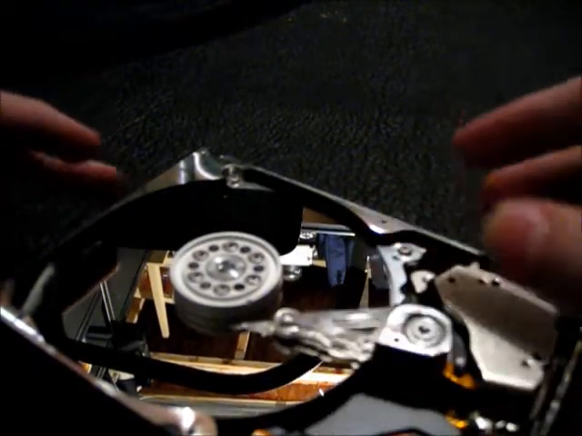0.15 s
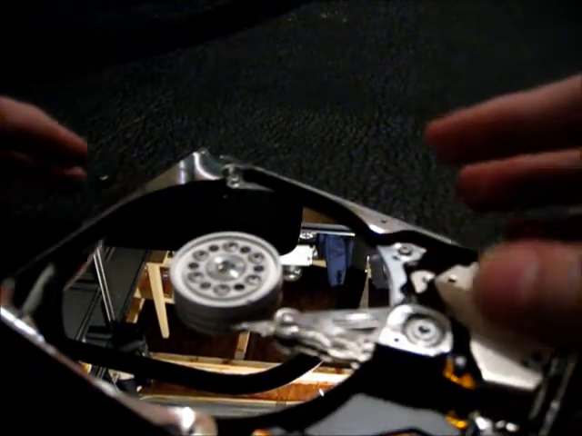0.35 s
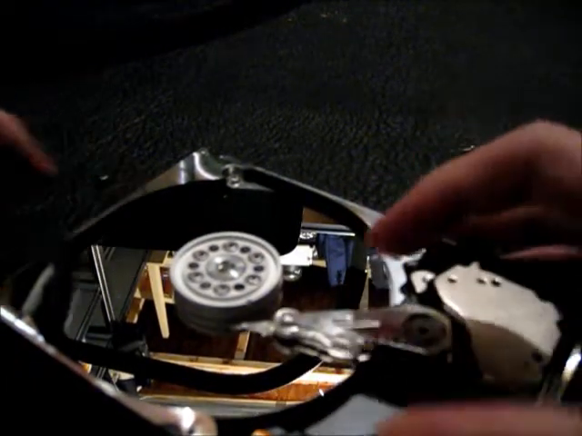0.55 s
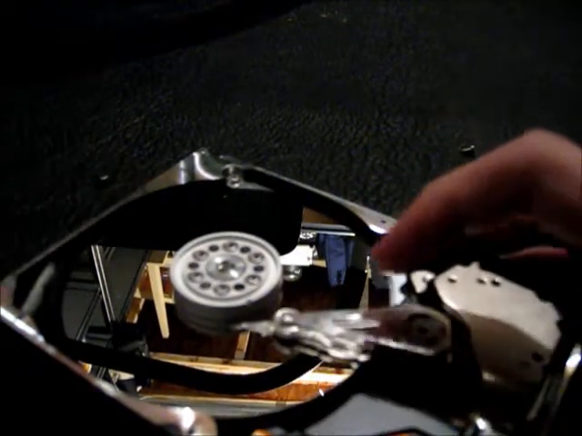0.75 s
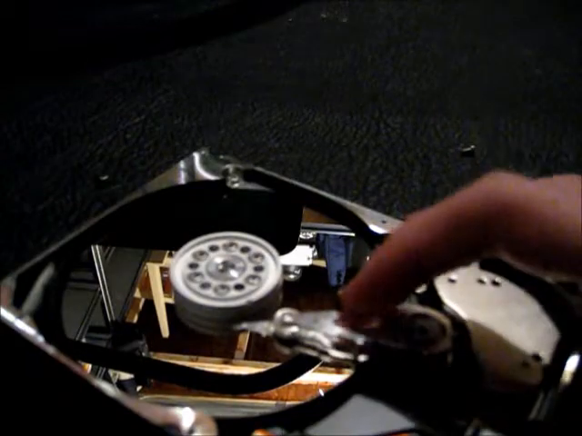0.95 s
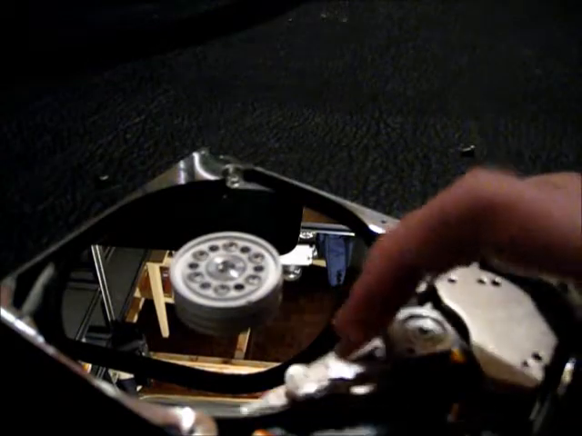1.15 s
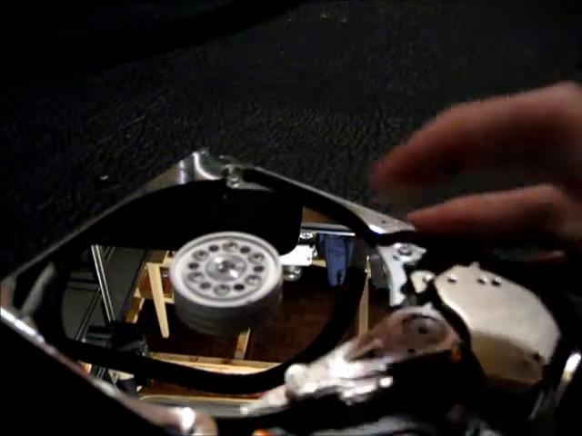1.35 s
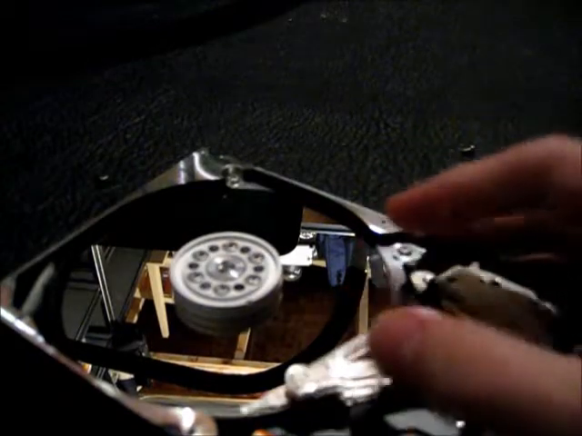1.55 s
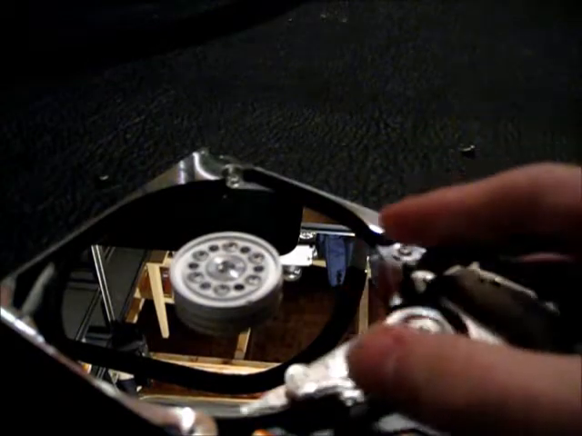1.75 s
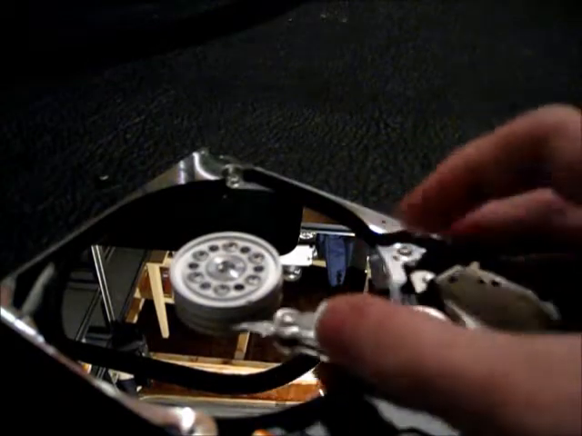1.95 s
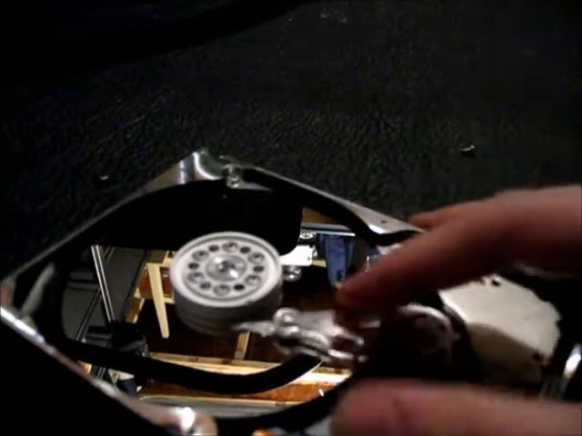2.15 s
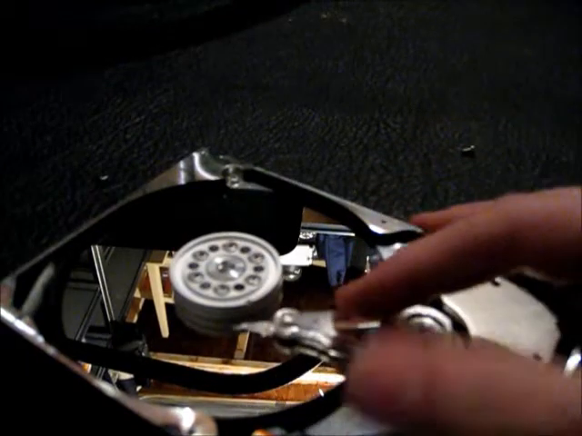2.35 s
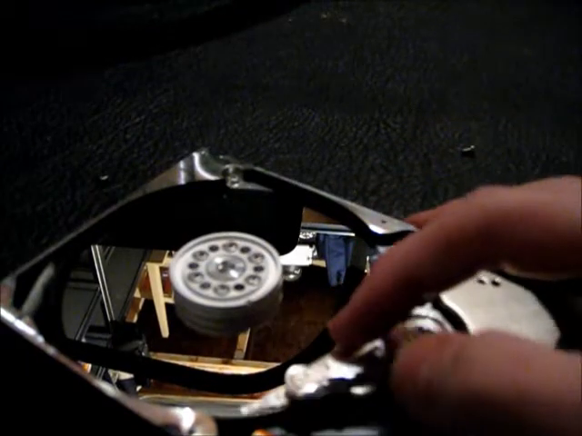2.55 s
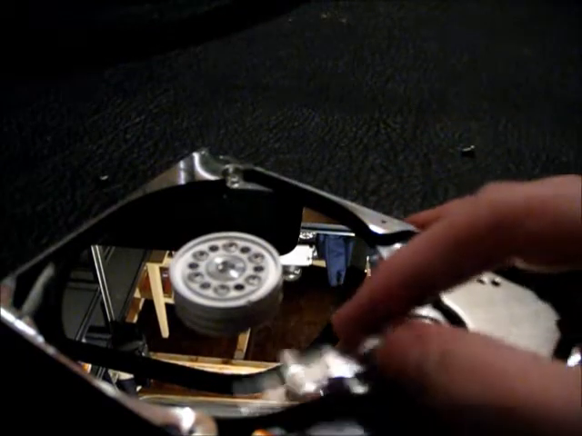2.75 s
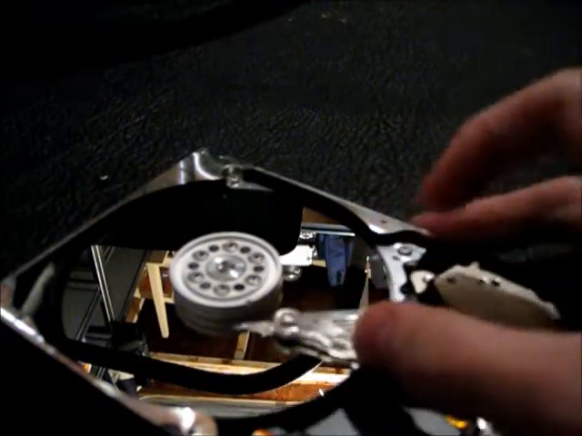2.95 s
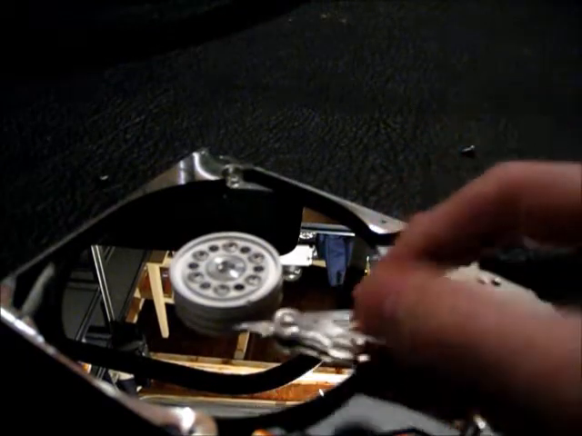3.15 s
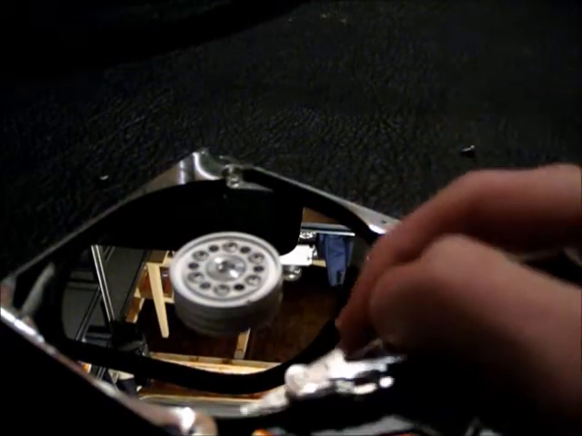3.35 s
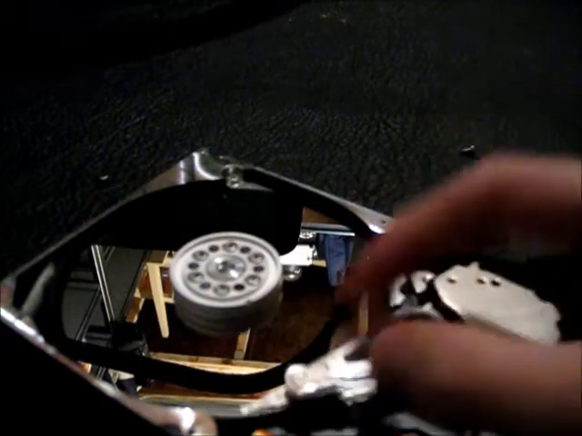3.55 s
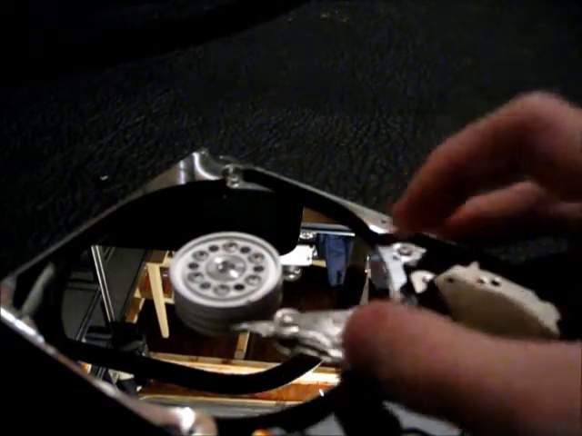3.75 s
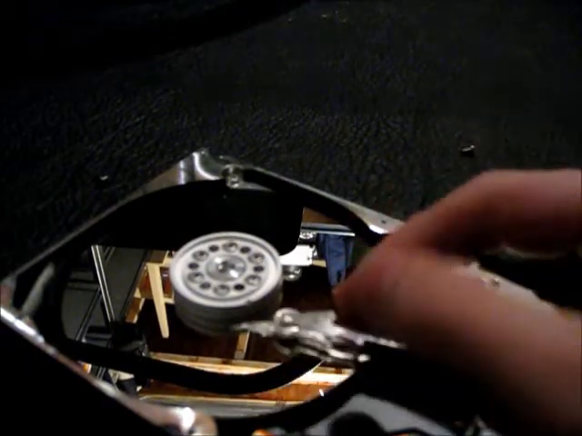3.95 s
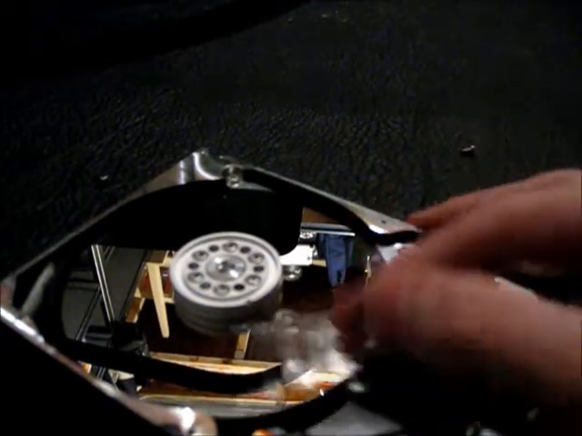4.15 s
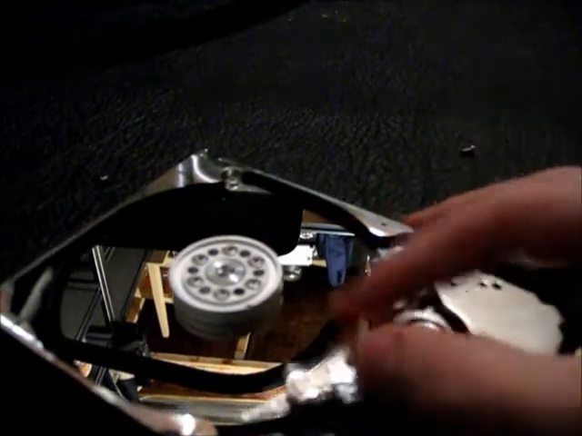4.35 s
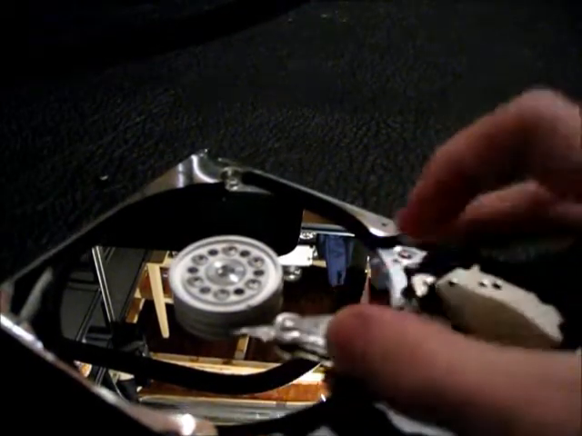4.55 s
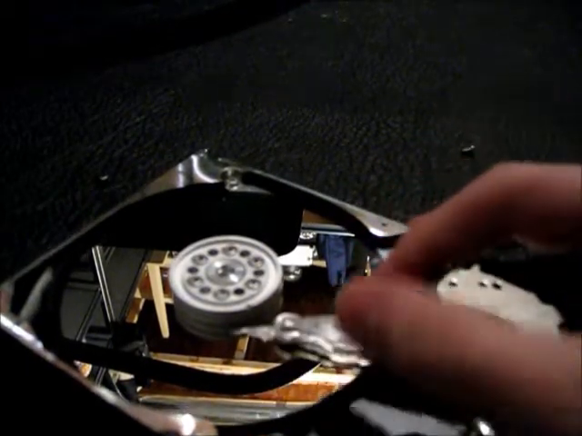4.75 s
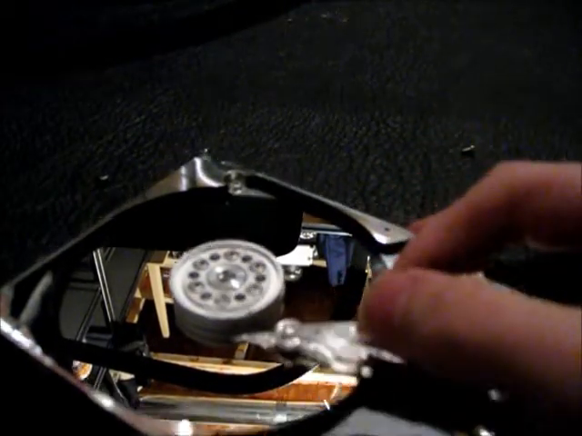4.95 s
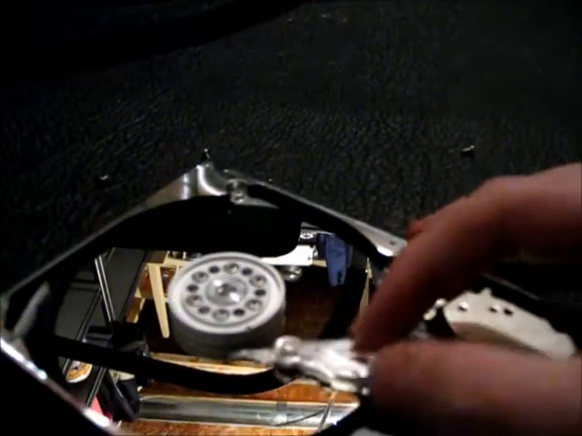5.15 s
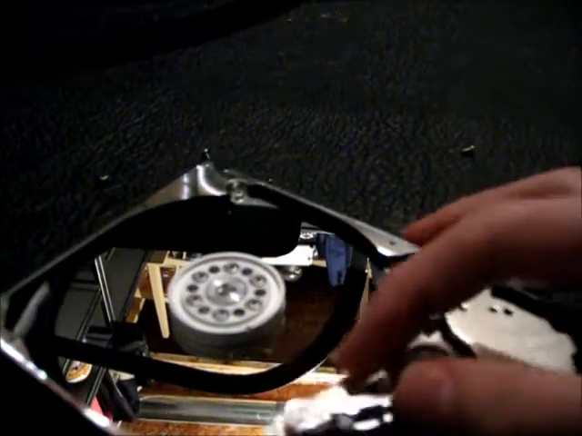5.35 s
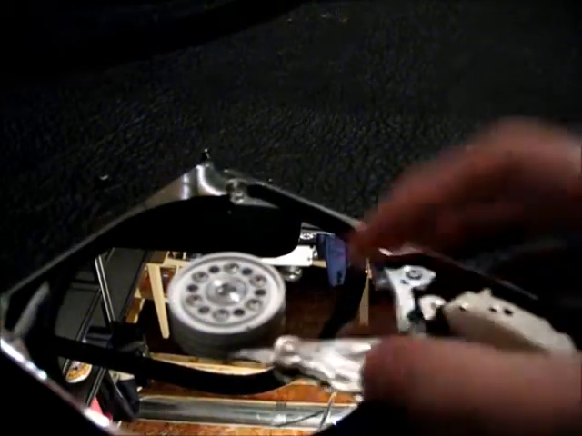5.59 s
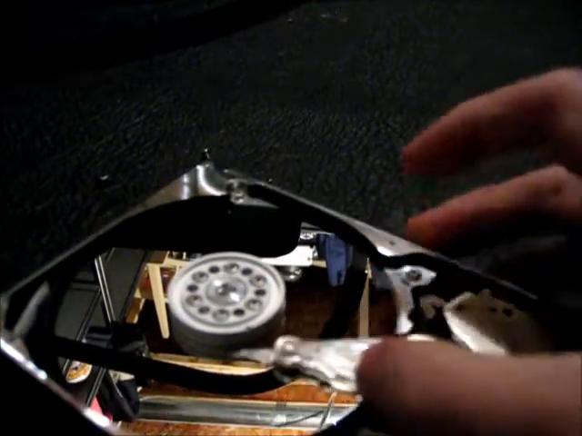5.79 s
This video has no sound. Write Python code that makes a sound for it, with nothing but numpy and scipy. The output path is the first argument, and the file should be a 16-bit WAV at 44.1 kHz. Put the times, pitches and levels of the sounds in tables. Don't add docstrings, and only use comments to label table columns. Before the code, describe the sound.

Faint mains hum and airy fan noise, with a few soft skin rustles first. From about one second, a thin metal arm snaps irregularly between two stops: loud, slightly clipped ringing clacks, lighter damped returns and crisp ticks. Small finger squeaks and a brief nail rattle come between. A small camera microphone sits very near; the room tail is short.

```python
import sys
import numpy as np
from scipy import signal
from scipy.fft import rfft, irfft, next_fast_len
from scipy.io import wavfile
from scipy.ndimage import uniform_filter1d, map_coordinates

SR = 44100
rng = np.random.default_rng(int(sys.argv[2]) if len(sys.argv) > 2 else 0)


def file_out(sig):
    cols = np.atleast_2d(sig).T
    lim = np.clip(cols, -1, 1)
    pcm = np.round(lim * 32767).astype(np.int16)
    wavfile.write(sys.argv[1], SR, pcm)


def nominal_scale(level):
    x = np.asarray(level, float) / 20
    return 10 ** x


N = 256662

# start_s, peak_db, thump_db
OUTER_STOP = [
    (1.118, 1, -17),
    (2.5306, 0.5, -22),
    (3.3825, 0.5, -19),
    (4.2166, 2, -16),
]
HUB_STOP = [
    (1.906, -3.5, -35),
    (4.485, -5, -28),
]
HELD_STOP = [
    (2.88, -5, -26),
    (3.667, -2.5, -29),
    (5.605, -0.5, -67),
]
GLANCE = [
    (5.367, -8, -27),
]

# start_s, peak_db
TICKS = [
    (1.8402, -14.5),
    (2.807, -12.5),
    (3.6212, -11.5),
    (4.4149, -9),
    (5.5498, -15),
]
NAIL = [(4.959, -33), (4.9955, -26), (5.003, -22.5), (5.0075, -33), (5.0215, -28), (5.027, -34),
        (5.0334, -24.5), (5.0404, -35), (5.0505, -26), (5.0668, -18.5), (5.071, -43)]
TAPS = [
    (0.88, -39),
    (2.488, -40),
    (3.3483, -36),
    (4.9884, -40),
    (5.334, -37),
]
SLIP = .015, -43

# pitch_hz, width_hz, level_db
OUTER_BODY = [(1140, 160, -18.5), (1520, 67, 4), (2560, 133, -3), (3130, 99, -7.5), (4120, 150, -8),
              (5077, 220, -2.5), (5560, 240, -4.5), (6840, 110, -21.5)]
HUB_BODY = [(1130, 127, -4), (1323, 76, -7), (1488, 36, 2), (1938, 34, -2.5), (2293, 146, -4.5),
            (2863, 70, 8), (4790, 54, -2.5), (5700, 540, -15.5)]
GLANCE_BODY = [(1050, 63, -7), (1640, 230, -17), (2570, 180, -13.5), (4860, 79, 5.5), (6220, 440, -9.5),
               (6870, 240, -11)]
TICK_BODY = [(1480, 290, -18), (2850, 74, 0), (5020, 180, 1), (6050, 140, -1.5), (7270, 117, 0)]
NAIL_BODY = [(1650, 620, -21.5), (3400, 190, -16), (5880, 1460, -8.5), (6400, 170, 0.5), (8600, 590, -30),
             (9900, 200, -28)]
TAP_BODY = [(1100, 400, -2), (1700, 740, 4.5), (3000, 490, 4)]
SIZZLE_BODY = [(8850, 330, 7.5), (11960, 550, 7.0), (14000, 2700, -13)]

# pitch_hz, level_db, t60_s
OUTER_RING = [(945, -11, 0.22), (990, -13, 0.2), (1410, -7, 0.34), (1535, -5, 0.22), (1567, 0, 0.25),
              (2095, -13, 0.25), (2372, -11, 0.28), (2993, -14, 0.3), (3330, -1, 0.28), (3445, 0, 0.27),
              (3960, -11, 0.28), (4441, -13, 0.23), (4813, -5, 0.24), (5090, -10, 0.22), (5600, -8, 0.22),
              (5645, -5, 0.22), (5780, -11, 0.22), (6255, -15, 0.33), (6729, -14, 0.24), (6966, -15, 0.25),
              (9110, -13, 0.22), (9210, -14, 0.22)]
HUB_RING = [(945, -6, 0.15), (988, -10, 0.5), (1317, -9, 0.15), (1567, 0, 0.19), (1965, -16, 0.26),
            (2270, -4, 0.089), (2822, -1, 0.17), (2865, -1, 0.2), (2905, -3, 0.25), (3467, -16, 0.25),
            (4005, -17, 0.19), (5070, -9, 0.12), (5701, -13, 0.24), (5965, -23, 0.28), (6250, -23, 0.29),
            (6950, -28, 0.34), (7284, -27, 0.27), (9243, -19, 0.17)]
HELD_RING = [(947, -4, 0.16), (990, -16, 0.4), (1567, -1, 0.21), (1962, -7, 0.2), (2326, -15, 0.33),
             (2818, -2, 0.2), (3052, -5, 0.21), (3472, -15, 0.28), (3978, -20, 0.29), (4161, -24, 0.32),
             (4393, -23, 0.28), (4942, -14, 0.21), (5125, -19, 0.24), (5782, -13, 0.28), (6250, -29, 0.4),
             (6605, -23, 0.25), (6950, -19, 0.23), (7327, -22, 0.21), (9085, -14, 0.22), (2870, -2, .2),
             (3015, -17, .42)]
GLANCE_RING = [(1416, -2, 0.15), (1567, -1, 0.17), (1965, 0, 0.13), (2326, -15, 0.36), (2982, -12, 0.3),
               (3338, -15, 0.27), (4936, -9, 0.2), (5776, -3, 0.13), (6681, -10, 0.22), (6955, -9, 0.19),
               (7208, -13, 0.19), (9076, -9, 0.2), (10550, -11, 0.13), (11110, -8, 0.13), (950, -3, .14)]
TICK_RING = [(2950, -9, .1), (5750, -5, .15), (6650, -3, .18), (6950, -4, .18), (7400, -7, .15),
             (10900, -11, .1), (12400, -11, .1)]
SLIP_RING = [(5100, -10, .1), (7400, -3, .12), (9100, -7, .12), (12100, -2, .1), (12500, 0, .12),
             (12800, -3, .1)]
NAIL_RING = [(1000, -8, .08), (1700, -4, .1), (6200, -3, .1), (6450, 0, .1), (7000, -5, .1),
             (10650, -4, .07)]

# pitch_hz, level_db (per Hz)
OUTER_ECHO = [(410, -88), (700, -87), (931, 8), (1120, -30.5), (1520, 3), (1800, -10), (3150, -4.5),
              (3360, -5.5), (3680, -13.5), (5790, -10.5), (8000, -18.5), (11100, -17), (15500, -30)]
HUB_ECHO = [(410, -91), (840, -38), (943, 8.5), (1120, -12), (1580, 2), (1780, -16), (1900, -6),
            (2840, -3.5), (3730, -14.5), (5860, -12), (8000, -19), (9110, -15), (15500, -30.5)]
GLANCE_ECHO = [(410, -59), (700, -31), (1560, -5), (1710, -9.5), (3400, -3.5), (3730, -33), (4890, -4),
               (8000, -18), (11200, -4.5), (15500, -34)]
TICK_ECHO = [(1290, -31), (2200, -33), (2930, -6), (3930, -19), (6740, -2.5), (7930, -15), (8890, -10),
             (12300, -24), (15500, -44)]
# pitch_hz, t60_s
ROOM = [(800, 0.22), (3000, 0.24), (8000, 0.25), (14000, 0.15)]

# start_s, hold_s, level_db, rise_db_per_s
BRUSH = [
    (0.278, 0.019, -44, 5000),
    (0.367, .005, -61, 400),
    (0.643, 0.064, -45, 268),
    (0.808, 0.054, -42.5, 294),
    (2.14, 0.053, -62.5, 150),
]
# pitch_hz, level_db (per Hz)
SKIN = [(880, -40), (1500, -14), (3470, -10), (6080, 1), (7180, -5), (7930, -12), (9650, -2), (13000, -8),
        (15800, -20)]
# center_s, length_s, pitch_hz, level_db
SQUEAKS = [
    (.98, .03, 4530, -70),
    (2.505, 0.03, 4500, -55),
    (3.132, .025, 3700, -55.5),
    (3.142, .025, 5300, -56.5),
    (3.168, .025, 5400, -62),
    (4.13, 0.045, 5100, -53),
]

# pitch_hz, level_db (rms), width_hz
HUM = [(122.3, -71.5, 2.02), (240.4, -60, 1.186), (360.5, -66.5, 1.12), (724, -73, 32), (960, -74, 3.3),
       (1183, -68, 1.335), (1400, -68.5, 3.1), (1868, -67, 81)]
# pitch_hz, level_db (per Hz)
AIR = [(12, -51), (20, -5), (113, -5), (145, -8.5), (240, -10), (268, -10.5), (355, -11.5), (386, -15),
       (456, -13), (1050, -16.5), (1430, -17), (2060, -18), (5320, -20.5), (7600, -28), (9200, -24),
       (11000, -28), (15800, -32.5)]


def unit(x):
    return x / np.sqrt(np.mean(x ** 2) + 1e-20)


def along(points, hz):
    f, v = np.transpose(points)
    return np.interp(np.log(hz + 1), np.log(f + 1), v)


def filtered(x, response):
    m = next_fast_len(len(x) + 8192)
    return irfft(rfft(x, m) * response(np.fft.rfftfreq(m, 1 / SR)), m)[:len(x)]


def noise(spectrum):
    return unit(filtered(rng.standard_normal(N), lambda f: nominal_scale(along(spectrum, f))))


def wobble(rate):
    knots = rng.standard_normal(int(N * rate / SR) + 4)
    return map_coordinates(knots, [np.arange(N) * rate / SR])


def resonances(peaks, f):
    total = 0
    for k, (center, width, db) in enumerate(peaks):
        total = total + (-1) ** k * nominal_scale(db) * 1j * f * width / (center ** 2 - f * f + 1j * f * width)
    return total


def steep_highpass(f):
    return (-f * f / (930 ** 2 - f * f + 1j * f * 900)) ** 3


def contact_force(t, contact_s, bounce_s, bounce_db, touch):
    bounce_db = min(bounce_db, -3)
    blow = nominal_scale(-60 * t / contact_s)
    bounce = nominal_scale(bounce_db - 60 * np.abs(t - bounce_s) / contact_s) * (t > bounce_s)
    force = (blow + bounce) * rng.standard_normal(len(t))
    force[[0, round(bounce_s * SR)]] += touch * nominal_scale([0, bounce_db])
    return force


def long_modes(t, modes):
    longest_s = 0.42
    ring = np.zeros(len(t))
    for hz, level_db, t60 in modes:
        beat_phase = 2 * np.pi * rng.uniform(20, 60) * t + rng.uniform(0, 2 * np.pi)
        beat_db = rng.normal(0, 1.5) + 3.5 * np.sin(beat_phase)
        level = nominal_scale(level_db + beat_db - 60 * t / min(t60, longest_s))
        ring += level * np.sin(2 * np.pi * hz * t + rng.uniform(0, 2 * np.pi))
    return ring


def room_tail(t, echo, damping):
    hz, s, z = signal.stft(rng.standard_normal(len(t)), SR, nperseg=256)
    decay_db = -60 * damping * s / along(ROOM, hz)[:, None]
    z = z * nominal_scale(along(echo, hz)[:, None] + decay_db)
    tail = signal.istft(z, SR, nperseg=256)[1][:len(t)]
    return tail / tail[:SR // 50].std()


def strikes(events, body, modes, echo, contact_s, bounce_s, damping, gain_db, room_db, early_db,
            sizzle_db, ring_db, bounce_db, touch=9):
    out, t = np.zeros(N + SR), np.arange(SR // 2) / SR
    swell = (1 - np.exp(-t / 0.0016)) * (1 + nominal_scale(early_db - 60 * t / 0.047))
    u = t / 0.00012
    push = u * np.exp(1 - u)
    brighter = nominal_scale(7 * (t >= bounce_s))
    for s, db, *thump_db in events:
        force = contact_force(t, contact_s, bounce_s, bounce_db, touch)
        clack = filtered(force, lambda f: resonances(body, f) * steep_highpass(f))
        sizzle = filtered(force * brighter, lambda f: resonances(SIZZLE_BODY, f) * steep_highpass(f / 6))
        ring = long_modes(t, modes)
        ring = ring / ring[:SR // 50].std() + nominal_scale(room_db) * room_tail(t, echo, damping)
        blow = clack / np.abs(clack).max()
        blow += nominal_scale(sizzle_db) * sizzle / np.abs(sizzle).max()
        blow += swell * nominal_scale(ring_db) * ring
        blow += nominal_scale(thump_db).sum() * push
        out[round((s - .0004) * SR):][:len(t)] += nominal_scale(db + gain_db) * blow
    return out[:N]


def arm():
    short, medium = .008, .012
    quick, late = .004, .011
    blurred = 2.5
    lead_s, slip_db = SLIP
    slipping = [(s - lead_s, slip_db) for s, *_ in OUTER_STOP + GLANCE]
    outer = strikes(OUTER_STOP, OUTER_BODY, OUTER_RING, OUTER_ECHO, medium, late, damping=0.88, gain_db=5,
                    room_db=0.5, early_db=12.5, sizzle_db=-14.5, ring_db=-28, bounce_db=-19)
    hub = strikes(HUB_STOP, HUB_BODY, HUB_RING, HUB_ECHO, short, quick, damping=1.16, gain_db=1.5,
                  room_db=-1.5, early_db=7, sizzle_db=-12, ring_db=-19.5, bounce_db=-2.5)
    held = strikes(HELD_STOP, HUB_BODY, HELD_RING, HUB_ECHO, short, quick, damping=1.34, gain_db=2,
                   room_db=2.5, early_db=5.5, sizzle_db=-11.5, ring_db=-23.5, bounce_db=-5.5)
    glance = strikes(GLANCE, GLANCE_BODY, GLANCE_RING, GLANCE_ECHO, short, quick, damping=1.5, gain_db=3.5,
                     room_db=4, early_db=3.5, sizzle_db=-7, ring_db=-25, bounce_db=-14)
    ticks = strikes(TICKS, TICK_BODY, TICK_RING, TICK_ECHO, medium, quick, damping=0.73, gain_db=-6,
                    room_db=-blurred, early_db=-21, sizzle_db=-5, ring_db=-24, bounce_db=-3.5)
    slips = strikes(slipping, TICK_BODY, SLIP_RING, TICK_ECHO, medium, quick, damping=3.1, gain_db=-1,
                    room_db=blurred, early_db=-11, sizzle_db=6, ring_db=-5, bounce_db=0.5)
    nail = strikes(NAIL, NAIL_BODY, NAIL_RING, TICK_ECHO, short, quick, damping=1.27, gain_db=-1.5,
                   room_db=blurred, early_db=-1, sizzle_db=-21, ring_db=-25, bounce_db=-11, touch=1)
    taps = strikes(TAPS, TAP_BODY, NAIL_RING[:2], OUTER_ECHO, short, quick, damping=2.2, gain_db=-0.5,
                   room_db=-blurred, early_db=2.5, sizzle_db=-35, ring_db=-19, bounce_db=-8)
    return outer + hub + held + glance + ticks + slips + nail + taps


def hands():
    t = np.arange(N) / SR
    lift_db_per_s = 280
    stroke, squeaks = np.zeros(N), np.zeros(N)
    for s, hold, db, rise in BRUSH:
        before, after = np.maximum(s - t, 0), np.maximum(t - s - hold, 0)
        stroke += nominal_scale(db - rise * before - lift_db_per_s * after)
    grain_db = 1.5 * wobble(300) + 1.2 * wobble(40)
    hiss = stroke * unit(noise(SKIN) * nominal_scale(grain_db))
    for s, length, hz, db in SQUEAKS:
        swell = np.exp(-(2 * (t - s) / length) ** 2)
        squeaks += nominal_scale(db) * swell * wobble(500) * np.sin(2 * np.pi * hz * t)
    return hiss + squeaks


def background():
    t = np.arange(N) / SR
    lines = np.zeros(N)
    for hz, db, width in HUM:
        level = nominal_scale(db + 4 + 1.1 * wobble(width * 1.7))
        lines += level * np.sin(2 * np.pi * hz * t + 1.97 * wobble(width))
    air = noise(AIR)
    high = filtered(air, lambda f: f > 3000)
    rumble = nominal_scale(-54 + 2.0 * wobble(4.2)) * (air - high)
    hiss = nominal_scale(-60 + 0.7 * wobble(1.2)) * unit(high)
    return lines + rumble + hiss


def scene():
    return (arm() + hands() + background())[None]


def roll_off(x):
    return signal.sosfilt(signal.butter(12, 16400, fs=SR, output="sos"), x)


def record(dry):
    level_db = 20 * np.log10(np.abs(dry[0]) + 1e-9)
    over_db = np.clip(.6 * (level_db + 10), 0, 7)
    climb_db = 85 * np.arange(N) / SR
    duck_db = np.maximum.accumulate(over_db + climb_db) - climb_db
    duck_db = np.pad(uniform_filter1d(duck_db, size=200), (100, 0))[:N]
    x = dry[0] * nominal_scale(-duck_db)
    x = filtered(x, lambda f: 1 - 1.56 * np.exp(-((f - 7950) / 230) ** 2))
    x = x / (1 + np.abs(x / .99) ** 8) ** (1 / 8)
    x = filtered(x, lambda f: 1 / (1 + (f / 15750) ** 120))
    return roll_off(x[None])


dry = scene()
out = record(dry)
file_out(out)
```